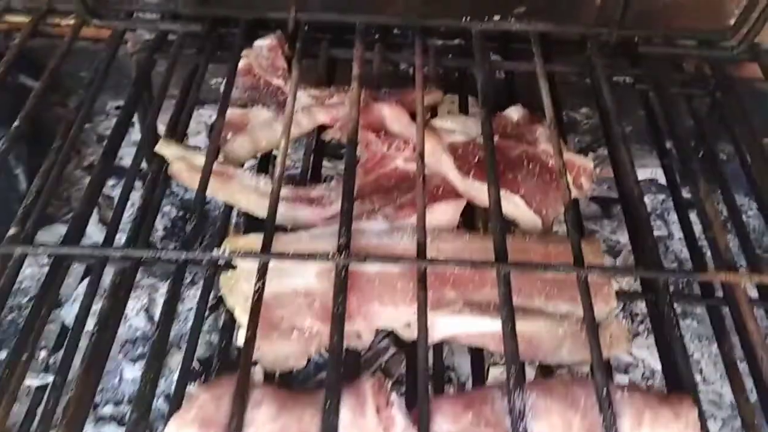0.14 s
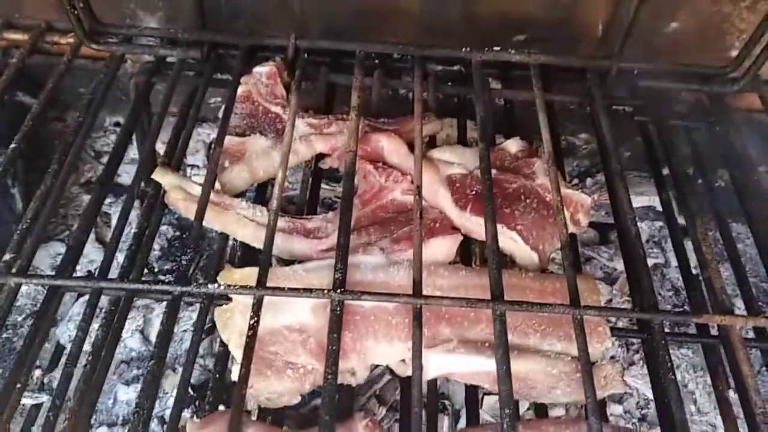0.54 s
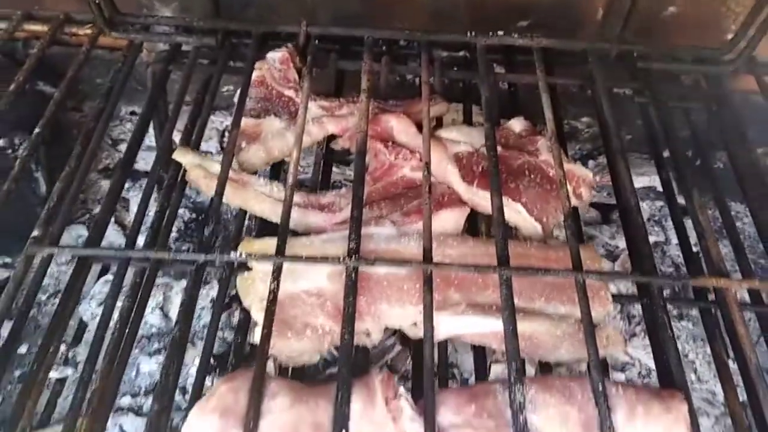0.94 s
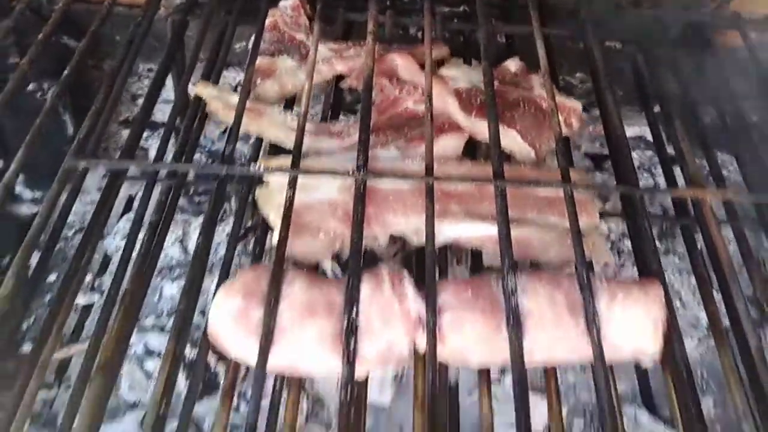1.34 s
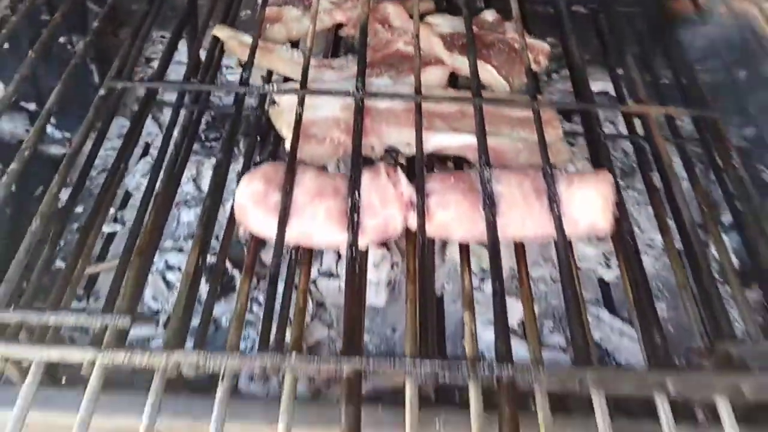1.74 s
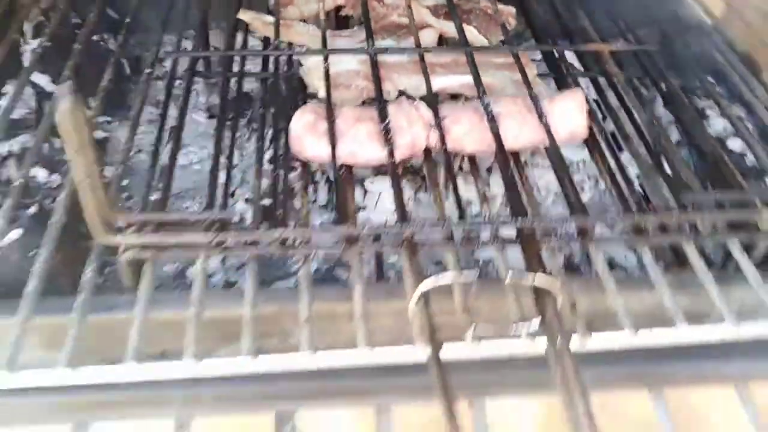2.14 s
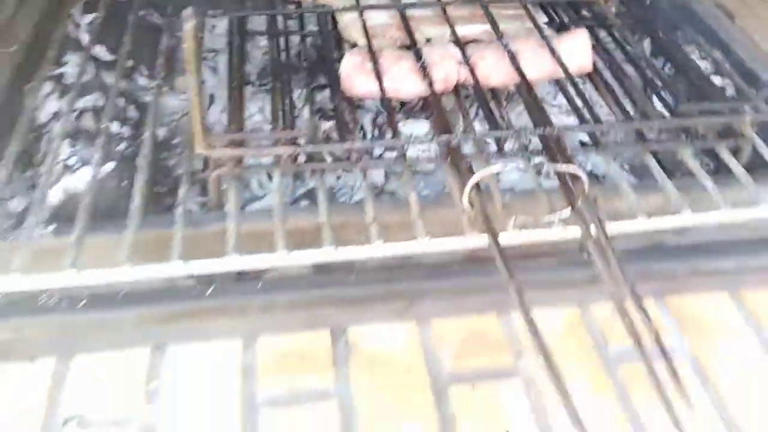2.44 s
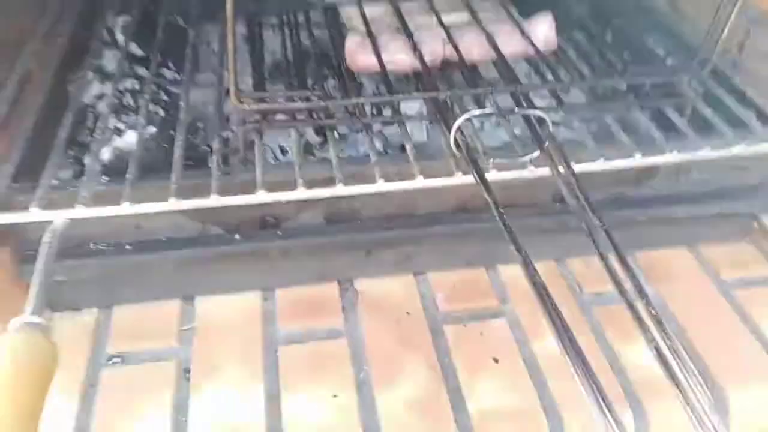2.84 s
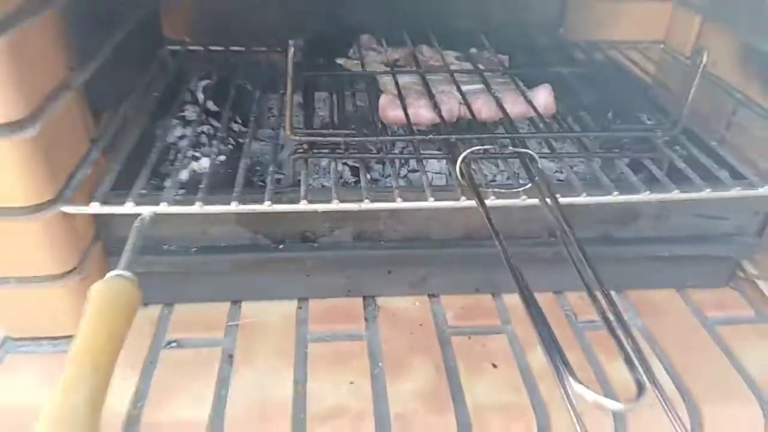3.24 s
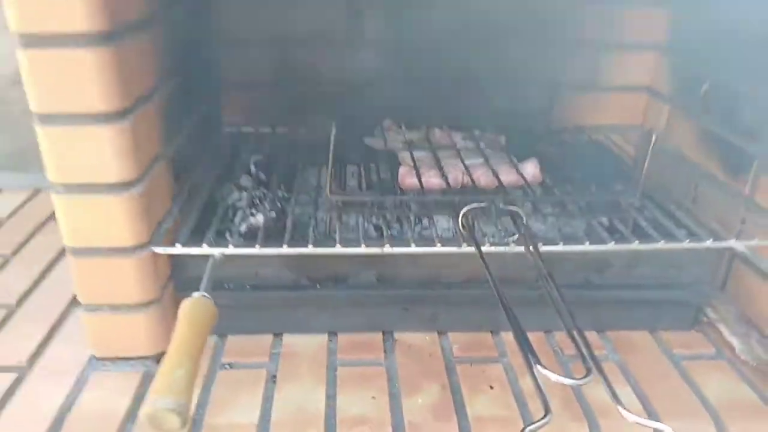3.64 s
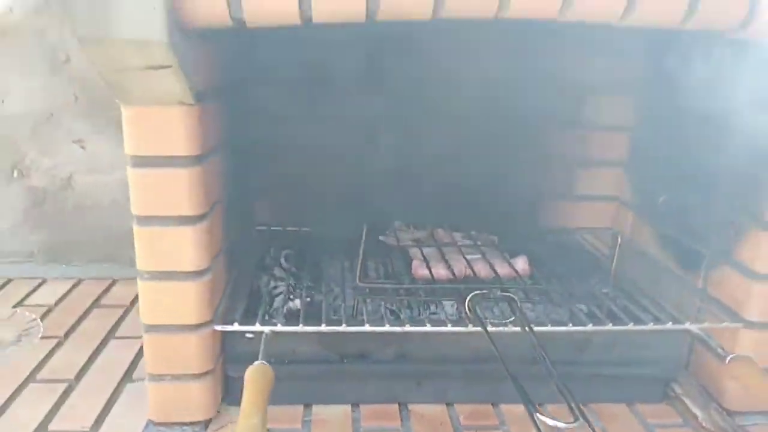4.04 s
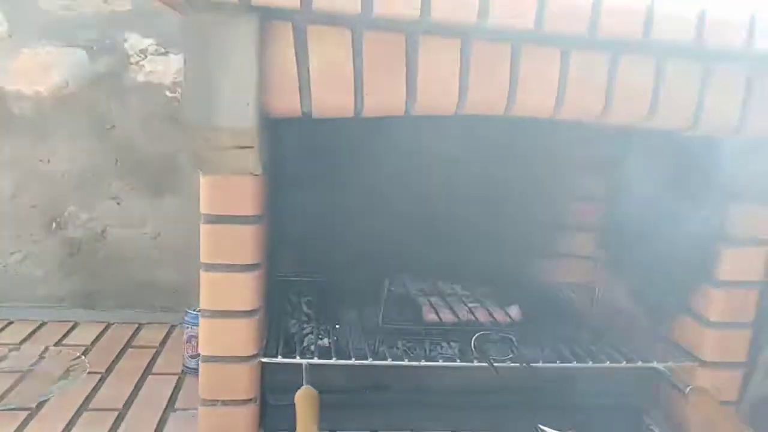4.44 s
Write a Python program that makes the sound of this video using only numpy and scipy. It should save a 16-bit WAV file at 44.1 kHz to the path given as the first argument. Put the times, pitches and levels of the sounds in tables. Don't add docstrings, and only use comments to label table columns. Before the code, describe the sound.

A stereo phone in a yard picks up bright grease pops with short hissing tails over quiet low rumble. Strong cracks come early, around one second and just after two. Then pops grow fainter and the frying recedes. Finger and wind rub buffets the left side in lumpy bursts, with a hardest blow near 4.3 seconds, and wet spits on the coals at right.

```python
import sys
import numpy as np
from scipy import signal
from scipy.io import wavfile
from scipy.ndimage import uniform_filter1d

SR = 44100
rng = np.random.default_rng(int(sys.argv[2]) if len(sys.argv) > 2 else 0)


def elevation(decibels):
    levels = np.asarray(decibels, float)
    return 10 ** (levels / 20)


def dump_mix(stems):
    frames = np.atleast_2d(stems).T
    limited = np.clip(frames, -1, 1)
    pcm = np.round(limited * 32767).astype(np.int16)
    wavfile.write(sys.argv[1], SR, pcm)


N = 202859
SIZE = 512
OVERLAP_GAIN = np.sqrt(SR / 2)

# (time [s], level [dB])
RUMBLE_LEVEL = [(0, -75.5), (.4, -71), (.6, -69), (.9, -77), (1.2, -67.5), (1.5, -75.5), (2.2, -78.5),
                (2.7, -76.5), (3.0, -71.5), (3.5, -69), (3.9, -60), (4.1, -68.5), (4.6, -68)]
# (frequency [Hz], density [dB per Hz])
RUMBLE_SPECTRUM = [(25, -40), (40, -22), (60, -10), (110, -10.5), (180, -25.5), (300, -45), (450, -59.5)]
# (time [s], rms [dB], low edge [Hz], high edge [Hz], T60 [s])
YARD_KNOCKS = [(.27, -73, 180, 480, .6), (0.495, -54, 594, 2440, 0.23), (1.141, -51, 175, 266, .08),
               (1.142, -48.5, 475, 2630, 0.08), (1.15, -59.5, 380, 3000, .8),
               (1.291, -53.5, 383, 2630, 0.21), (1.46, -75, 1640, 1785, 1.2),
               (1.786, -53.5, 380, 540, 0.15), (1.79, -60.5, 605, 2050, 0.17),
               (1.799, -54, 72.8, 125, 0.21), (2.094, -63.5, 1320, 2210, .08),
               (2.203, -54.5, 1040, 2700, 0.22), (2.204, -66, 450, 810, 0.13), (2.548, -61, 580, 900, 0.16),
               (3.601, -48.5, 260, 600, 0.16), (4.095, -46, 236.5, 421, 0.077)]
# (time [s], rms [dB], low edge [Hz], high edge [Hz], T60 [s])
FINGER_TAPS = [
    (.459, -56, 1320, 2510, 0.055),
    (.6, -66, 300, 2500, .3),
    (0.944, -57, 200, 5000, .22),
    (2.59, -62, 286, 2030, .08),
    (2.634, -63.5, 151, 408, 0.05),
]
# (time [s], rms [dB], low edge [Hz], high edge [Hz], T60 [s])
DRIPS = [
    (2.96, -63, 400, 3000, .35),
    (3.192, -46, 1520, 5400, 0.038),
    (3.2, -55, 1560, 4130, 0.46),
    (3.329, -58.5, 1550, 3780, 0.32),
    (3.605, -54.5, 500, 2800, 0.2),
    (4.098, -61, 1470, 1900, 0.2),
    (4.125, -51, 2870, 7820, 0.28),
    (4.525, -70, 400, 1500, .5),
]
# (peak time [s], bass [dB], dullness [dB], rise [s per 20 dB], fall [s per 20 dB])
STROKES = [(2.81, -35, 1.5, .055, .1), (2.905, -35, 1.0, .08, .033), (3.03, -38, 10, .004, .03),
           (3.055, -45, .1, .04, .06), (3.08, -32, 2.5, .03, .07), (3.2, -45, 16, .2, .3),
           (3.345, -31.5, 9.5, .1, .11), (3.59, -42, 16.5, .3, .12), (3.77, -41, 28, .14, .04),
           (3.95, -50, 36, .6, .5), (4.13, -43, 21, .08, .2), (4.255, -38, 14.5, .035, .2),
           (4.345, -32, 13.5, .025, .055), (4.44, -52, 11, .1, .1), (4.55, -45, 25, .9, .9)]
# (time [s], peak [full scale], width [s])
PRESSURE_THUMPS = [
    (0.951, -.013, 0.002),
    (2.7708, -0.11, 0.00008),
    (2.937, -0.088, 0.0045),
    (3.027, 0.052, 0.00031),
    (4.246, 0.02, .003),
    (4.3239, -0.53, 0.00044),
]
# (frequency [Hz], density [dB per Hz])
SIZZLE_SPECTRUM = [(500, -112), (1200, -104), (2200, -97.5), (3500, -89), (5000, -86), (7500, -85.5),
                   (9000, -91), (10500, -85), (12500, -96.5), (14200, -103)]
# (time [s], level re full sizzle [dB])
LEAK_LEVEL = [(0, -1), (.45, -3), (.75, -5), (.95, -8.5), (1.12, -7.5), (1.4, -5), (1.7, -13.5),
              (2.05, -14), (2.3, -13.5), (2.55, -18.5), (2.8, -10.5), (3.08, -6), (3.24, -23), (3.7, -32.5),
              (4.6, -38)]
# (time [s], left-right level of the leak [dB])
LEAK_PAN = [(0, -9), (.95, -5), (1.15, -15), (1.7, -21), (2.3, -19), (2.6, -28), (4.6, -33)]
# (centre [Hz], width [Hz], share spared [0-1])
SPARED_BANDS = [
    (1700, 110, 0.5),
    (2050, 130, 0.45),
    (4100, 220, 0.72),
    (6840, 890, .62),
    (7450, 170, 0.14),
    (10260, 1800, 0.46),
]
# (time [s], right peak [dB], left-
# right level by place on the grate [dB], ring [Hz])
FAT_POPS = [(0.259, -25, -11, 6370), (0.2872, -20.5, -6, 5710), (0.381, -42, -8, 5500),
            (0.4596, -26, -9.5, 5400), (0.6402, -34.5, -12, 6900), (0.8188, -45, -24.5, 9940),
            (1.1014, -47.5, -13, 6570), (1.1412, -18.5, -10.5, 8480), (1.4577, -39.5, -22, 4650),
            (1.6963, -39.5, -9.5, 7000), (1.7547, -34, -22, 7750), (2.0946, -38, -19, 4180),
            (2.1845, -46, -18, 4300), (2.2044, -16.5, -15, 5140), (2.5479, -33, -25.5, 7280),
            (2.789, -50, -21, 3870), (2.887, -46, -1, 4970), (2.9737, -35.5, -10, 7600),
            (3.1932, -62, -14, 3800), (3.5401, -38.5, -51, 7120), (3.781, -56, -26, 10852),
            (3.9864, -54.5, -43.5, 8268), (4.1262, -47.5, -45, 4478), (4.2762, -57, -38.5, 11714),
            (4.4, -64, -40, 10500), (4.5286, -33, -55, 6160)]
# (frequency [Hz], density [dB per Hz])
SUPPRESSOR_LINE = [(150, -125), (400, -112), (1500, -112), (4000, -110), (8000, -112), (14000, -112)]
# (frequency [Hz], density [dB per Hz])
HISS_FLOOR = [(100, -118), (500, -120), (1500, -126), (6000, -122), (11000, -124), (13000, -127),
              (14300, -129), (14500, -150)]


def at_hz(points, hz):
    table_hz, value = np.transpose(points)
    return np.interp(np.log(hz + 1), np.log(table_hz), value)


def at_time(points, s):
    return np.interp(s, *np.transpose(points))


def grid(size=SIZE):
    hz = np.arange(size // 2 + 1)[:, None] * SR / size
    return hz, np.arange(4 * N // size + 2)[None] * size / 4 / SR


def to_grid(x, size=SIZE):
    return signal.stft(x, nperseg=size, noverlap=3 * size // 4)[2]


def from_grid(z, size=SIZE):
    return signal.istft(z, nperseg=size, noverlap=3 * size // 4)[1][..., :N]


def shaped(noise, db, size=SIZE):
    z = to_grid(noise, size)
    return from_grid(z * elevation(db[:, :z.shape[1]]) * OVERLAP_GAIN, size)


def smooth(field, bins, frames):
    return uniform_filter1d(uniform_filter1d(field, bins, axis=-2), frames, axis=-1)


def patches(bins, frames):
    hz, s = grid()
    field = smooth(rng.standard_normal((hz.size, s.size)), bins, frames)
    return field / field.std()


def band_db(z, bins, frames):
    power = smooth(np.abs(z) ** 2, bins, frames)
    return 10 * np.log10(np.maximum(power, 0) * 4 * SIZE / 3 / SR + 1e-20)


def soft_gate(under_db, soft_db):
    return 1 / (1 + np.exp(np.clip(under_db / soft_db, -30, 30)))


def lumpy(size, db):
    lumps = uniform_filter1d(rng.standard_normal(N), size=size)
    return elevation(db * (lumps / lumps.std() - db / 9))


def resonance(x, hz, width_hz):
    r = np.exp(-np.pi * width_hz / SR)
    feedback = [1, -2 * r * np.cos(2 * np.pi * hz / SR), r * r]
    return signal.lfilter([(1 - r * r) / 2, 0, -(1 - r * r) / 2], feedback, x)


def rumble(alike=0.45):
    size = 4 * SIZE
    hz, s = grid(size)
    level_db = at_hz(RUMBLE_SPECTRUM, hz) - 30 * (hz > 600) + at_time(RUMBLE_LEVEL, s)
    mid, side = (shaped(rng.standard_normal(N) * lumpy(size=1500, db=1.0), level_db, size)
                 for _ in range(2))
    return np.sqrt((1 + alike) / 2) * mid + np.sqrt((1 - alike) / 2) * side * [[1], [-1]]


def knocks(rows, pan_db, alike=0.6, rise_s=0.0013, broad=0.73, narrow=.07):
    out, t = np.zeros((2, N + 12000)), np.arange(12000) / SR
    port_db = np.array([[min(pan_db, 0)], [-max(pan_db, 0)]])
    for at, rms_db, low_hz, high_hz, t60_s in rows:
        mid, side = rng.standard_normal((2, 12000))
        hollows_hz = low_hz * (high_hz / low_hz) ** rng.random(4)
        noise = np.sqrt(1 + alike) * mid + np.sqrt(1 - alike) * side * [[1], [-1]]
        puff = noise * elevation(-60 * t / t60_s) * (1 - np.exp(-t / rise_s))
        puff = broad * puff + sum(resonance(puff, hz, narrow * hz) for hz in hollows_hz)
        band = signal.butter(3, [low_hz, high_hz], "band", fs=SR, output="sos")
        puff = signal.sosfilt(band, puff)
        puff /= np.sqrt(np.mean(puff[:, :1300] ** 2))
        i = round(at * SR)
        out[:, i:i + 12000] += puff * elevation(rms_db + port_db)
    return out[:, :N]


def thumps(cut_hz=67.0):
    t = np.arange(N) / SR
    push = sum(peak * np.exp(-np.abs(t - at) / width_s) for at, peak, width_s in PRESSURE_THUMPS)
    push = signal.sosfilt(signal.butter(8, 2700, fs=SR, output="sos"), push)
    return signal.sosfilt(signal.butter(2, cut_hz, "high", fs=SR, output="sos"), push)


def rub(lumps_db=2.5, grit_db=2.0, top_db=-14.5, hold=.12, mid_speed=1.2, treble_dullness=4.2,
        treble_speed=1.05):
    size = 2 * SIZE
    hz, s = grid(size)
    at, bass_db, dull_db, rise_s, fall_s = np.transpose(STROKES)[..., None]
    away = np.maximum((at - s) / rise_s, (s - at) / fall_s)
    fade_db = 20 * np.maximum(away - hold, 0)

    def strongest(dullness, speed):
        stroke_db = bass_db - dullness * dull_db - speed * fade_db
        return np.maximum(stroke_db.max(axis=0), -120)

    low = strongest(0, 1)
    mid = strongest(1, mid_speed)
    high = strongest(treble_dullness, treble_speed)
    knots_hz = [25, 55, 130, 400, 1400, 3600, 6000, 14000]
    knots_db = np.array([low - 50, low - 26, low - 22, mid - 27, mid - 33 + .3 * (high - mid),
                         (mid + high) / 2 - 38, high - 41, high - 40 + top_db])
    place = np.interp(np.log(hz[:, 0] + 1), np.log(knots_hz), np.arange(8))
    k = np.minimum(place.astype(int), 6)
    level_db = knots_db[k] + (place - k)[:, None] * (knots_db[k + 1] - knots_db[k])
    grit = elevation(grit_db * np.minimum(rng.exponential(1, N), 6)) * rng.choice([-1, 1], N)
    return shaped(grit / grit.std() * lumpy(size=300, db=lumps_db), level_db, size)


def pop_gate(s, peak_db, at, low_cut, bands, speed, fall_db_per_s=237.5):
    full_db = -41.5
    near_db = at_time(LEAK_LEVEL, at)
    open_db = min(-46.0 + .75 * (peak_db + 34), full_db) + .22 * near_db
    open_db -= 40 * (peak_db < -53)
    hold_s = .062 + .0135 * max(peak_db + 38, 0) * elevation(near_db)
    since = s - at - .004
    uneven_db = .45 * min(full_db - open_db, 20) * bands
    closing_db = 60 * since + fall_db_per_s * speed * np.maximum(since - hold_s, 0)
    return since, open_db + uneven_db + 44 - 11.0 * low_cut - closing_db


def sizzle(spread=3.39, patchy=0.38, patch_db=4.5):
    hz, s = grid()
    leak_db, leak_pan_db = at_time(LEAK_LEVEL, s), at_time(LEAK_PAN, s)
    spared = sum(share * np.exp(-((hz - mid_hz) / width_hz) ** 2)
                 for mid_hz, width_hz, share in SPARED_BANDS)
    shadow = np.clip(np.log2(hz / 1800 + 1e-9) / 1.1, 0, 1)
    leak_cut = np.clip(np.log2(2200 / (hz + 1)), 0, 2)
    gate_cut = np.clip(np.log2(2300 / (hz + 1)), 0, 2)
    left_db = leak_pan_db * shadow - 10. * (hz > 7300) - 3.3 * (hz < 4700)
    out = []
    for left in (1, 0):
        depth = spread * (1 - spared) * (1 + patchy * patches(bins=3, frames=90))
        level_db = leak_db * np.clip(depth, .75, None) - 14.0 * leak_cut + left * left_db
        speed = np.clip(1 + 0.33 * patches(bins=3, frames=60), .3, None)
        bands = patches(bins=3, frames=70) + 2.5 * spared - .8
        for at, peak_db, pan_db, _ in FAT_POPS:
            since, gate_db = pop_gate(s, peak_db, at, gate_cut, bands, speed)
            shade = np.minimum(shadow - (pan_db + 30.5) / 25 * (pan_db < -15), 1)
            gate_db = np.where(since > 0, gate_db + left * pan_db * shade, -99)
            level_db = np.maximum(level_db, gate_db)
        level_db = level_db + patch_db * (1 + 0.34 * left) * patches(bins=2, frames=22)
        out.append(shaped(rng.standard_normal(N), at_hz(SIZZLE_SPECTRUM, hz) + level_db))
    return np.array(out)


def pops(width_hz=590.0, broad=0.18, snap_db=7.5, snap_s=0.0012, lead_s=0.00095, lead_db=-19.0,
         click=3.2, far_rise_s=.002):
    out, t = np.zeros((2, N + 4000)), np.arange(4000) / SR
    lead = elevation(lead_db) * np.exp((t - .0045) / lead_s) * (t < .0045)
    t = np.maximum(t - .0045, 0)
    edge = signal.butter(2, [2400, 13500], "band", fs=SR, output="sos")
    onset = [1 - np.exp(-t / far_rise_s), elevation(snap_db * np.exp(-t / snap_s))]
    for at, peak_db, pan_db, ring_hz in FAT_POPS:
        t60_s = .035 - .0013 * max(pan_db, -45)
        noise, spacing_hz = rng.standard_normal((2, 4000)), rng.uniform(2300, 2800)
        peaks_hz = ring_hz + spacing_hz * np.array([-2, -1, 1, 2, 3])
        others_hz = [hz for hz in peaks_hz if 3900 < hz < 11300]
        side = .68 * (1 if peak_db > -53 else .3)
        burst = noise * (elevation(-60 * t / t60_s) * (t > 0) + lead) * onset
        burst[1, np.argmax(t > 0)] += click * elevation(snap_db)
        crack = broad * burst + 2 * resonance(burst, ring_hz, width_hz)
        crack = crack + sum(2 * side * resonance(burst, hz, width_hz) for hz in others_hz)
        crack = signal.sosfilt(edge, crack)
        crack /= np.sqrt(uniform_filter1d(crack ** 2, size=88).max(axis=1, keepdims=True))
        i = round((at - .004) * SR)
        out[:, i:i + 4000] += crack * elevation(peak_db + np.array([[pan_db - 0.5], [0]]))
    return out[:, :N]


def scene():
    blows = knocks(YARD_KNOCKS, pan_db=.6) + knocks(FINGER_TAPS, pan_db=21.0)
    blows = blows + knocks(DRIPS, pan_db=-35.0)
    handling = (rub() + thumps()) * [[1], [0]]
    return rumble() + blows + handling + sizzle() + pops()


def suppressor(x, soft_db=4.5, patch_db=4.0):
    hz, _ = grid()
    z = to_grid(x)
    uneven = np.array([patches(bins=3, frames=40) for _ in range(2)])
    line_db = (at_hz(SUPPRESSOR_LINE, hz) + patch_db * uneven)[..., :z.shape[2]]
    z = z * soft_gate(line_db - band_db(z, bins=3, frames=6), soft_db)
    hiss_db = at_hz(HISS_FLOOR, hz) - 5.5 * (hz > 2500) * [[[1]], [[0]]]
    return z + to_grid(rng.standard_normal((2, N))) * elevation(hiss_db) * OVERLAP_GAIN


def treble_dropout(z, margin_db=63.5, most_db=-48.0, treble_db=26., patch_db=7.5):
    hz, _ = grid()
    level_db = band_db(z, bins=4, frames=10)
    total_db = 10 * np.log10((elevation(2 * level_db) * (hz > 3000)).sum(axis=(0, 1)) * SR / SIZE)
    line_db = np.minimum(total_db, most_db) - margin_db - 40 * (hz < 2500)
    line_db = line_db + treble_db * np.log2(np.maximum(hz / 10500, 1))
    uneven = np.array([patches(bins=4, frames=14) for _ in range(2)])
    line_db = line_db + patch_db * uneven[..., :z.shape[2]]
    return z * soft_gate(line_db - level_db, 1.9)


def low_pass(x):
    return signal.sosfilt(signal.butter(12, 15350, fs=SR, output="sos"), x)


def record(dry):
    x = signal.sosfilt(signal.butter(5, 50, "high", fs=SR, output="sos"), dry)
    x = from_grid(treble_dropout(suppressor(x)))
    x = signal.sosfilt(signal.cheby2(8, 40, 15300, fs=SR, output="sos"), x)
    return low_pass(x)


dry = scene()
out = record(dry)
dump_mix(out)
```